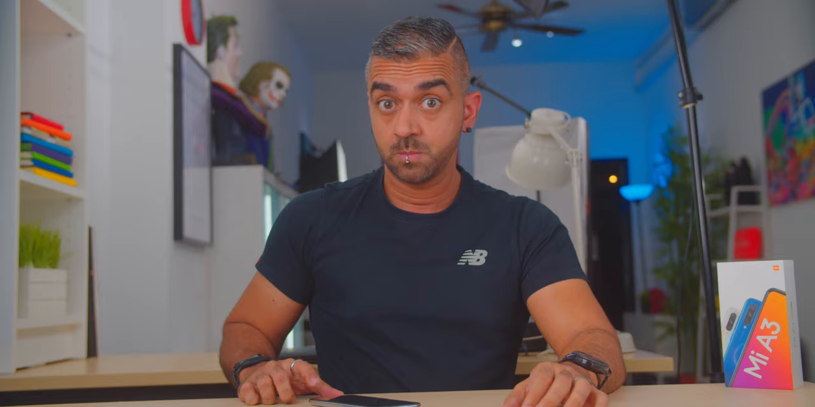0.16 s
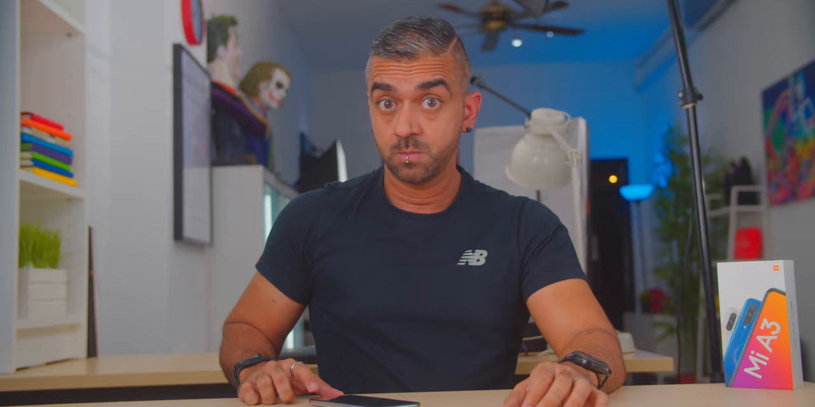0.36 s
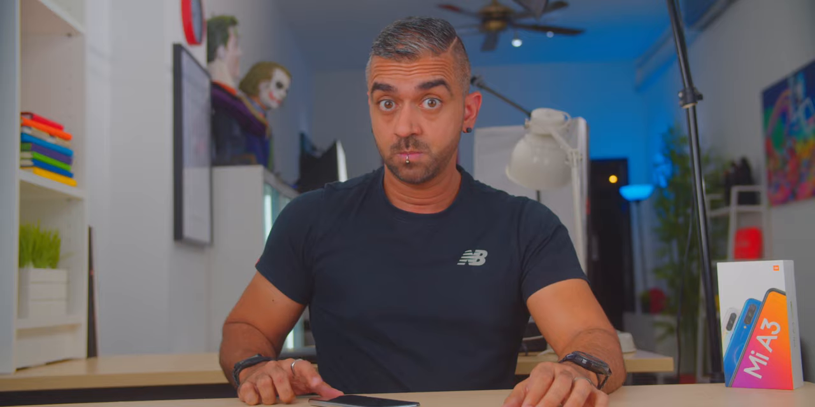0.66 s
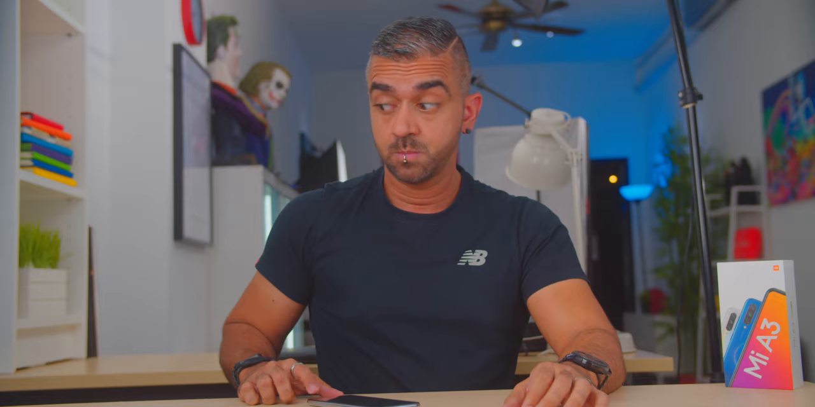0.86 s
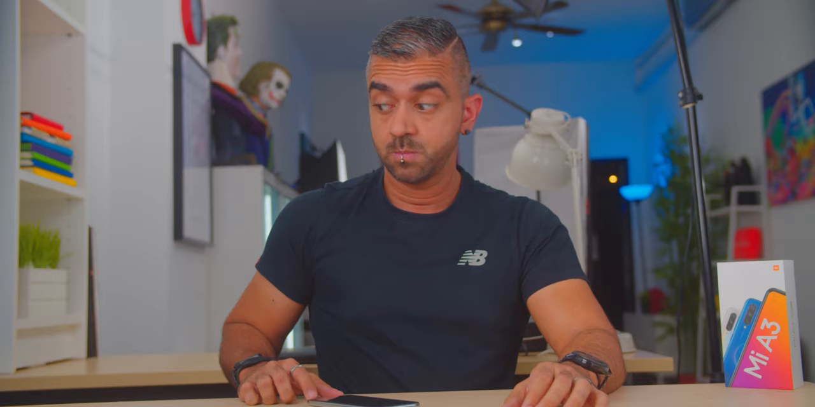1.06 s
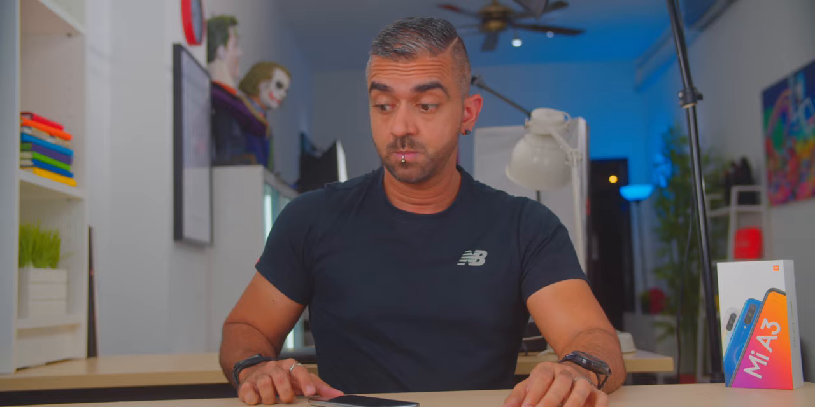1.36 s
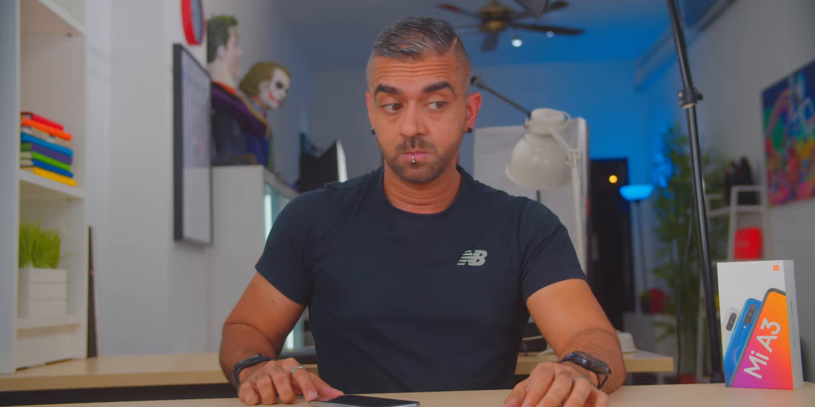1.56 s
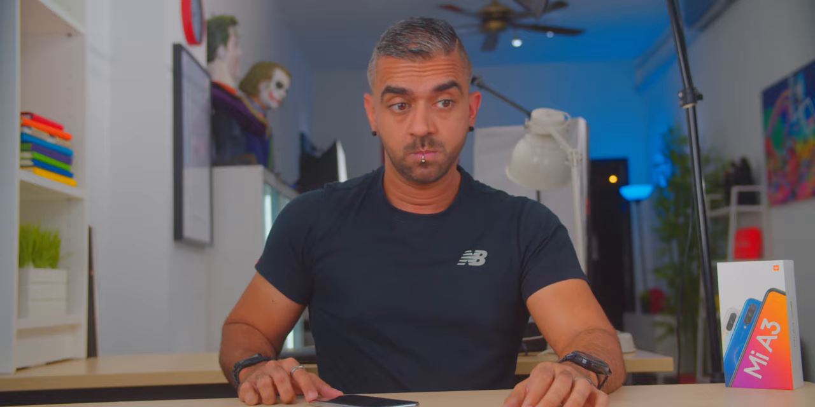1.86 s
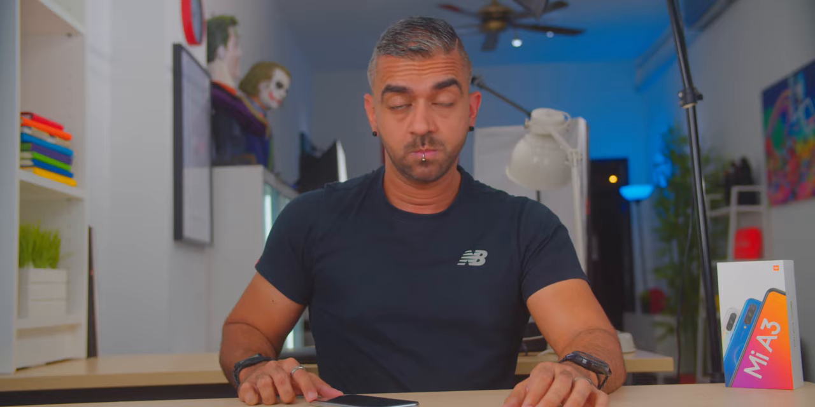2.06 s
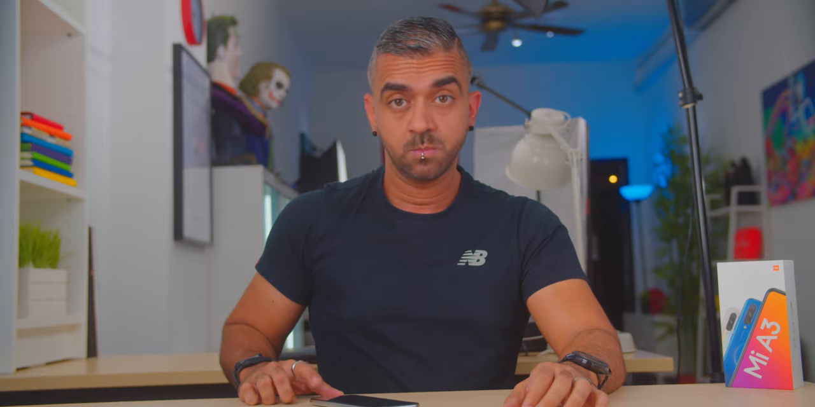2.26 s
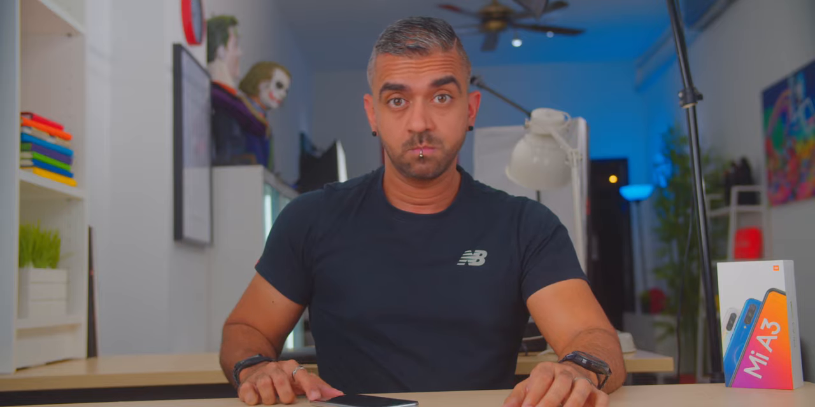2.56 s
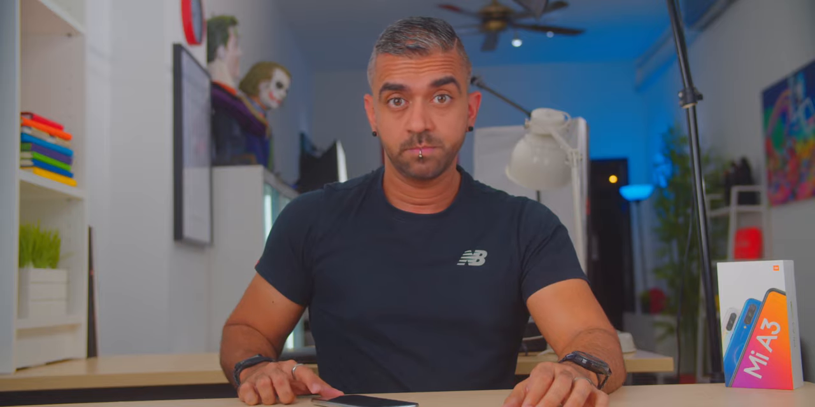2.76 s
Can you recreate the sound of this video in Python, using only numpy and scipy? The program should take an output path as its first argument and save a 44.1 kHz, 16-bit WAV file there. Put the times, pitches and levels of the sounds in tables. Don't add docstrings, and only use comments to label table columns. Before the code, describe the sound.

A phone lying on a wooden desk is rocked by a finger, clacking down about four times a second, each clack followed by a softer bounce and tiny ticks, in a furnished room with low air hum.

```python
import sys
import numpy as np
from scipy import signal
from scipy.fft import rfft, irfft, next_fast_len
from scipy.io import wavfile
from scipy.ndimage import uniform_filter1d

SR = 44100
rng = np.random.default_rng(int(sys.argv[2]) if len(sys.argv) > 2 else 0)


def dump_mix(stems):
    frames = np.atleast_2d(stems).T
    limited = np.clip(frames, -1, 1)
    pcm = np.round(limited * 32767).astype(np.int16)
    wavfile.write(sys.argv[1], SR, pcm)


def makeup_ratio(level_db):
    decades = np.asarray(level_db, float) / 20
    return 10 ** decades


N = 127890
LEAD = 882


def along(points, hz):
    f, v = np.transpose(points)
    return np.interp(np.log(hz + 1), np.log(f + 1), v)


def coloured(x, points):
    m = next_fast_len(len(x) + 8192)
    gain = makeup_ratio(along(points, np.fft.rfftfreq(m, 1 / SR)))
    return irfft(rfft(x, m) * gain, m)[:len(x)]


def contact_time(start_s):
    first = round(start_s * SR) - LEAD
    return first, np.arange(first, first + SR // 3) / SR - start_s


SCATTER_DB = 1.5

# (pitch_hz, level_db, time to fall 60 dB: t60_s)
CASE = [(669, 9.5, 0.026), (1240, 4, 0.019), (1449, 4.5, 0.036), (1670, -5, 0.019), (2200, -9.5, 0.03),
        (3090, -1.5, 0.0055), (3278, -0.5, 0.0059), (3780, -3, 0.015), (5400, -23, 0.0045),
        (5520, 6, 0.0023), (7870, -11.5, 0.01), (8300, -28, 0.0074), (11220, -6.5, 0.0021),
        (13800, -10, .004)]
# (delay_s, level_db)
ECHOES = [(.0013, -9.5), (.0145, -33.5)]
# (pitch_hz, level_db)
SHADOW = [(4000, 0), (4350, -10), (4800, -12), (5200, 0)]
CASE_DB, CRACK_DB, CRACK_T60_S = -3.5, -29.5, 0.024
RISE_CYCLES = 0.49
TICK_DULL_DB = 5.5


def click(t, dull_db):
    length, t = len(t), t[:SR // 10]
    u = np.maximum(t, 0)
    crack = uniform_filter1d(rng.standard_normal(len(t)), size=3) * (t > 0)
    x = makeup_ratio(CRACK_DB - 60 * u / CRACK_T60_S) * crack
    for hz, db, t60 in CASE:
        level_db = db + dull_db * (hz < SR / 20) + SCATTER_DB * rng.standard_normal()
        rise = 1 - np.exp(-u * hz / RISE_CYCLES)
        x = x - makeup_ratio(level_db - 60 * u / t60) * np.sin(2 * np.pi * hz * u) * rise
    x = x + sum(-makeup_ratio(db) * np.roll(x, round(s * SR)) for s, db in ECHOES)
    x = coloured(x, SHADOW) * (t > -1 / SR)
    return makeup_ratio(CASE_DB) * np.pad(x, (0, length - len(t)))


# (pitch_hz, level under a clack: clack_db, under a bounce: bounce_db, t60_s)
DESK = [(64.9, -9.5, -7.5, 0.14), (102.7, -18, -8.5, 0.16), (158.5, -6.5, -6.5, 0.052),
        (201.7, -9, -7.5, 0.032), (225.9, -14.5, -17, 0.18), (266.7, -7, -12.5, 0.16),
        (320.1, -19, -6, 0.14), (368.5, -15.5, -20.5, 0.098), (409.5, -19.5, -19, 0.049),
        (537.2, -17.5, -29, 0.071), (643, -29, -23, 0.073), (735.3, -32, -31.5, 0.21)]
# (low_hz, high_hz)
WITH_PUSH_HZ = (120, 350)
SWELL_S = .0038


def thud(t, column, scatter_db):
    gains = makeup_ratio(scatter_db * rng.standard_normal(len(DESK)))
    u = np.maximum(t, 0)
    x = np.zeros(len(t))
    for gain, row in zip(gains, DESK):
        hz, t60 = row[0], row[-1]
        with_push = column == 2 or WITH_PUSH_HZ[0] < hz < WITH_PUSH_HZ[1]
        sign = 1 if with_push else -1
        x += sign * gain * makeup_ratio(row[column] - 60 * u / t60) * np.cos(2 * np.pi * hz * t)
    return np.exp(np.minimum(t, 0) / SWELL_S) * x


# (start_s, clack_db, thud_db, chatter_db)
EARLIER = (-.125, -28, -17, -20)
# (start_s, clack_db, thud_db, chatter_db)
CLACKS = [(0.1268, -27.5, -21, -15), (0.3703, -27.5, -21, -13.5), (0.614, -32, -22, -21),
          (0.8665, -28, -20, -9.5), (1.1246, -31.5, -24, -16), (1.3755, -30, -23, -13.5),
          (1.6396, -28.5, -19, -11), (1.928, -27, -18.5, -18.5), (2.2004, -29.5, -20, -30.5),
          (2.46, -26.5, -19, -7), (2.707, -27, -18.5, -10)]
TOUCH_S, TOUCH_DB = .009, -35
CHATTER_S, THUD_LAG_S = .0045, .0025


def clacks():
    out = []
    for s, clack_db, thud_db, chatter_db in [EARLIER] + list(CLACKS):
        first, t = contact_time(s)
        hard = click(t, 0)
        hard = hard + makeup_ratio(TOUCH_DB) * click(t + TOUCH_S, TICK_DULL_DB)
        hard = hard + makeup_ratio(chatter_db) * click(t - CHATTER_S, TICK_DULL_DB)
        soft = makeup_ratio(thud_db) * thud(t - THUD_LAG_S, column=1, scatter_db=SCATTER_DB)
        out.append((first, clack_db, hard, soft))
    return out


# (start_s, thud_db, tick_db)
BOUNCES = [(0.1575, -24.5, -42.5), (0.4001, -25.5, -43), (0.6383, -31.5, -48.5), (0.8962, -26, -44.5),
           (1.1499, -30.5, -54), (1.4037, -28.5, -70), (1.675, -28.5, -54), (1.9624, -29, -68),
           (2.2327, -30, -57), (2.4977, -25.5, -41.5), (2.742, -26.5, -50)]
# (start_s, thud_db, tick_db)
LIFTS = [(0.278, -56, -96), (0.479, -47, -62), (0.769, -54, -82), (.99, -46.5, -72), (1.301, -52, -73),
         (1.522, -49, -85), (1.804, -42.5, -60.5), (2.092, -44, -86), (2.331, -52, -66), (2.602, -52, -62),
         (2.857, -45.5, -62)]
TICK_BEFORE_S, TICK_AFTER_S, FIRST_TICK_DB = .0037, .0023, -2
BOUNCE_SCATTER_DB = 5


def bounces_and_lifts():
    out = []
    for s, thud_db, tick_db in BOUNCES + LIFTS:
        first, t = contact_time(s)
        ticks = makeup_ratio(FIRST_TICK_DB) * click(t + TICK_BEFORE_S, TICK_DULL_DB)
        ticks = ticks + click(t - TICK_AFTER_S, TICK_DULL_DB)
        soft = makeup_ratio(thud_db) * thud(t, column=2, scatter_db=BOUNCE_SCATTER_DB)
        out.append((first, tick_db, ticks, soft))
    return out


# (pitch_hz, t60_s)
ROOM = [(50, 0.37), (110, 0.71), (280, 0.34), (740, 0.44), (1940, 0.66), (5120, 0.56), (13500, 0.13)]
EARLY_DB, EARLY_T60_S = -6, 0.049


def room_answer(colour):
    hz, t, z = signal.stft(rng.standard_normal(SR // 2), SR, nperseg=512, noverlap=384)
    fading = z * makeup_ratio(-60 * t / along(ROOM, hz)[:, None])
    late = signal.istft(fading, SR, nperseg=512, noverlap=384)[1]
    u = np.arange(len(late)) / SR
    early = rng.standard_normal(len(late)) * makeup_ratio(-60 * u / EARLY_T60_S)
    x = late / np.linalg.norm(late) + makeup_ratio(EARLY_DB) * early / np.linalg.norm(early)
    x = x * (1 - np.exp(-u / 0.001))
    return coloured(np.pad(x, (220, 0)), colour)[220:]


# (start_s, level_db)
RINGS = [
    (-.09, -34.5),
    (0.157, -34.5),
    (.4, -36),
    (.9, -37),
    (1.15, -49.5),
    (2.235, -45),
    (2.499, -34.5),
    (2.741, -35.5),
]
RING_HZ, RING_T60_S, RING_RISE_S = 223.9, 0.61, 0.011


def desk_ring():
    x = np.zeros(N)
    for s, db in RINGS:
        u = np.maximum(np.arange(N) / SR - s, 0)
        rise = 1 - np.exp(-u / RING_RISE_S)
        x += makeup_ratio(db - 60 * u / RING_T60_S) * rise * np.sin(2 * np.pi * RING_HZ * u)
    return x


# (pitch_hz, level_db per Hz)
AIR = [(26, -37.5), (45, 6), (101, -1.5), (426, -34), (631, -24.5), (1600, -47), (2250, -48), (4240, -55.5),
       (15500, -58.5)]
AIR_DB = -49


def air():
    x = coloured(rng.standard_normal(N), AIR)
    return makeup_ratio(AIR_DB) * x / x.std()


# (pitch_hz, level_db)
WET = [(50, -4), (110, -3.5), (200, -11), (300, -5.5), (500, -1), (1000, -3.5)]
# (pitch_hz, level_db)
WASH = [(250, -14), (450, 22), (750, 28.5), (1400, 25.5), (2900, 10), (4500, 1.5), (8000, -4),
        (14000, -11.5)]
SAME_SHARE = .5


def scene():
    mix = np.zeros(N + 2 * SR)
    same = room_answer(WASH)
    for first, click_db, hard, soft in clacks() + bounces_and_lifts():
        start = first + SR
        wet = signal.fftconvolve(soft, room_answer(WET))
        wash = np.sqrt(SAME_SHARE) * same + np.sqrt(1 - SAME_SHARE) * room_answer(WASH)
        mix[start:][:len(wet)] += wet
        mix[start + LEAD:][:len(wash)] += makeup_ratio(click_db) * wash
        mix[start:][:len(soft)] += soft + makeup_ratio(click_db) * hard
    return (mix[SR:SR + N] + desk_ring() + air())[None]


def roll_off(x):
    return signal.sosfilt(signal.butter(12, 16490, fs=SR, output="sos"), x)


# (pitch_hz, level_db)
MIC = [(20, -9), (40, 0), (14700, 0), (15400, -10)]


def record(dry):
    mix = coloured(dry[0], MIC)[None]
    return roll_off(mix)


dry = scene()
out = record(dry)
dump_mix(out)
```